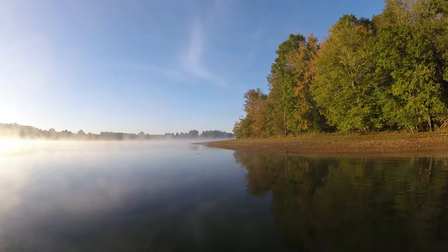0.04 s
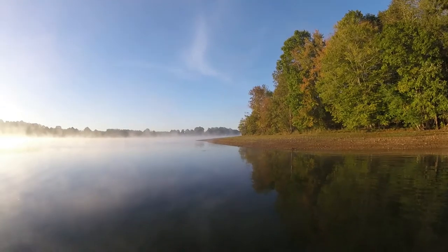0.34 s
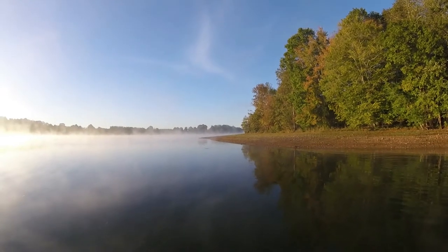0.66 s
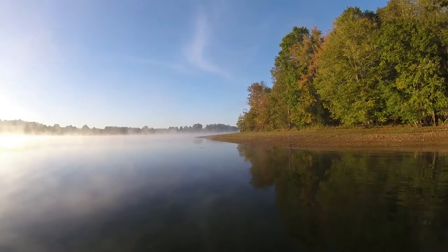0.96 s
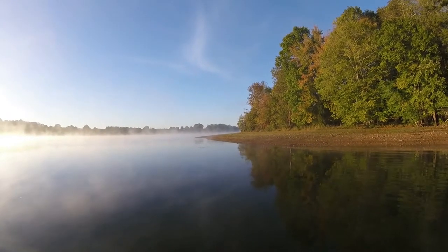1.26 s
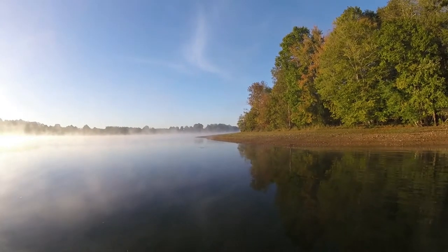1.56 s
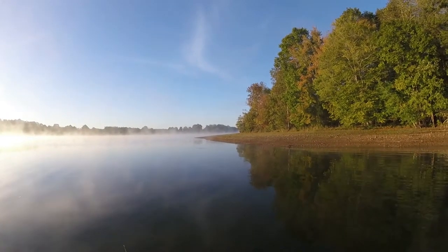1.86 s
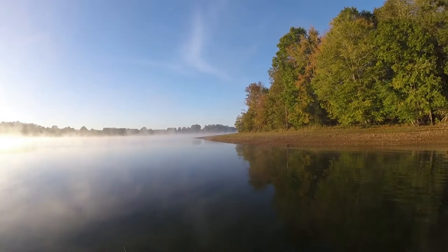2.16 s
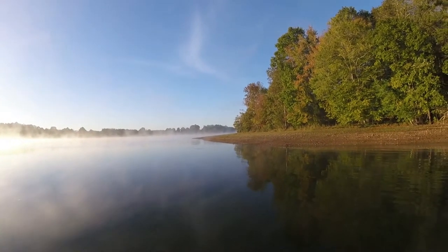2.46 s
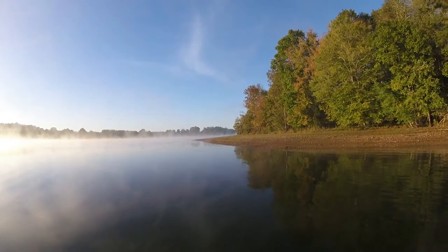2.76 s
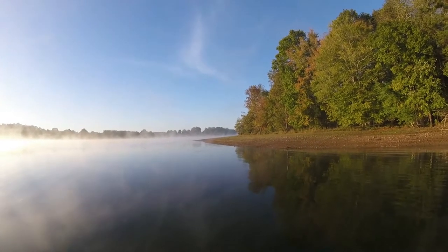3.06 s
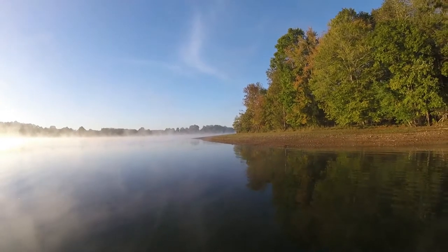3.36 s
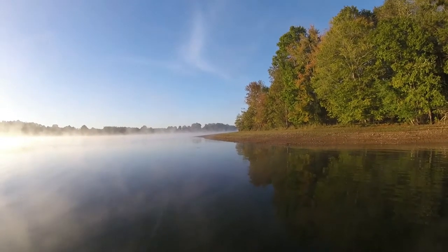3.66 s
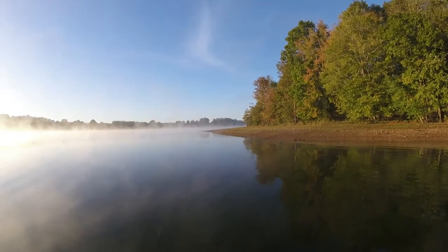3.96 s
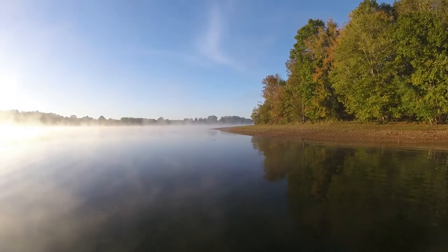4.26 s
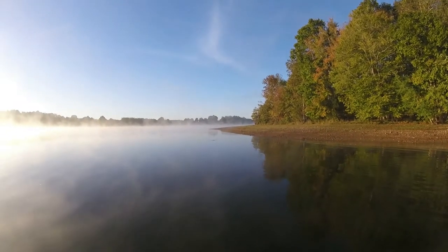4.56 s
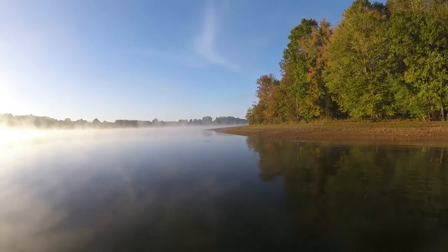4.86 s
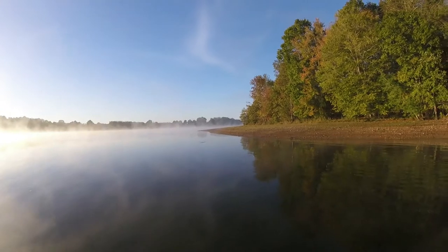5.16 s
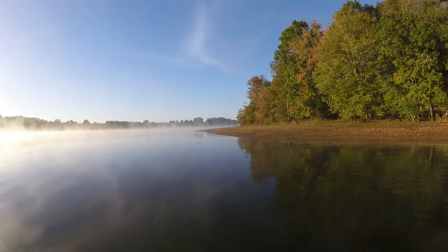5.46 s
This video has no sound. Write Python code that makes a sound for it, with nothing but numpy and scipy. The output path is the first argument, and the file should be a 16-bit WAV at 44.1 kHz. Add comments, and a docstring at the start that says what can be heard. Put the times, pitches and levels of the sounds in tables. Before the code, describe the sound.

A small boat's electric motor hums steadily over a soft wash of water, with tiny bubble ticks and a faint bird.

```python
"""Trolling motor on a calm lake

An electric motor pushes a small boat slowly along. Its shaft, slowing very slightly, shakes the hull
four times a turn: forced vibration makes a hum, and resonance keeps the hull droning. Water washes
along it and tiny bubbles tick at the bow. A small bird calls faintly twice in the trees on the shore,
over the steady hiss of the microphone on the boat."""
import sys
import numpy as np
from scipy import signal
from scipy.fft import rfft, irfft, next_fast_len
from scipy.io import wavfile
from scipy.ndimage import uniform_filter1d

SR = 44100
rng = np.random.default_rng(int(sys.argv[2]) if len(sys.argv) > 2 else 0)


def persist_wave(psi):
    """Save psi, clipped to +-1, as 16-bit WAV."""
    counts = np.round(np.clip(psi, -1, 1) * 32767).astype(np.int16)
    wavfile.write(sys.argv[1], SR, np.atleast_2d(counts).T)


N = 247842
T = np.arange(N) / SR
SHAFT_HZ, SLOWING_HZ_PER_S = 22.86, .138  # turns per second at the start, and their steady fall


def undb(db):
    """The decibel scale: amplitude grows tenfold every 20 dB."""
    return 10 ** (np.asarray(db) / 20)


def drift(rate_hz):
    """Low-pass fluctuation: random steps, smoothed twice; spread near 1."""
    hold = int(SR / rate_hz)
    steps = np.repeat(rng.standard_normal(N // hold + 1), hold)
    return 1.3 * uniform_filter1d(uniform_filter1d(steps, hold), hold)[:N]


def filtered_noise(gain_at):
    """Linear filtering: the spectrum of white noise times a gain at each frequency."""
    size = next_fast_len(N, True)
    hz = np.maximum(np.arange(size // 2 + 1) * SR / size, 1)
    return irfft(rfft(rng.standard_normal(size)) * gain_at(hz), size)[:N]


def coloured_noise(spectrum):
    """Spectral shaping: noise whose power density follows (frequency_hz, density_db) points."""
    hz, db = np.transpose(spectrum)
    return np.sqrt(SR / 2) * filtered_noise(lambda f: undb(np.interp(np.log(f), np.log(hz), db)))


def resonance(pitch_hz, width_hz):
    """Random excitation: a resonator passes a narrow band of noise; rms 1."""
    band = filtered_noise(lambda f: 1 / (1 + ((f - pitch_hz) / width_hz) ** 2))
    return band / band.std()


def glides(rows, rasp_rad, grain_samples):
    """Phase modulation: random jitter roughens sliding tones that swell and fade."""
    out = np.zeros(N)
    jitter = uniform_filter1d(rng.standard_normal(N), size=grain_samples)
    jitter = rasp_rad * jitter / jitter.std()
    for middle_s, length_s, start_hz, end_hz, level_db in rows:
        count = max(int(length_s * SR), 8)
        span = np.clip(int((middle_s - length_s / 2) * SR) + np.arange(count), 0, N - 1)
        phase = 2 * np.pi * np.cumsum(np.linspace(start_hz, end_hz, count)) / SR
        swell = np.sin(np.linspace(0, np.pi, count))
        out[span] += undb(level_db) * swell * np.sin(phase + jitter[span])
    return out


def scattered(direct, echo_db, t60_s):
    """Scattering: a diffuse, exponentially decaying tail follows the direct sound."""
    t = T[:SR // 2]
    tail = rng.standard_normal(len(t)) * np.exp(-np.log(1000) * t / t60_s)
    return direct + undb(echo_db) * signal.fftconvolve(direct, tail / np.linalg.norm(tail))[:N]


# Partials of the hum: shaft_multiple, starting_level_db, gain_db_per_hz of slowing
SHAFT_HARMONICS = [(4, -54.5, 12), (8, -55, -1), (9, -69, -3), (10, -68, 11), (12, -61, -4), (16, -58, 6.5),
                   (19, -72, 12), (20, -61.5, 13), (23, -77, 3), (24, -61, 8), (28, -62.5, 0),
                   (30, -74.5, 1.5), (32, -62.5, -10.5), (36, -66, -4), (40, -70.5, -2), (44, -75.5, -3.5)]

def motor_hum(speed_hz, angle, flutter_db=.56, wobble_rad=.008):
    """Forced vibration: shaft harmonics swell or fade as they slide across the hull's response."""
    dispersion_rad, panel_hz, panel_width_hz = .024, 380, 55
    slowing_hz = SHAFT_HZ - speed_hz
    angle = angle + wobble_rad * drift(12)
    hum = 0
    for order, starting_level_db, gain_db_per_hz in SHAFT_HARMONICS:
        level_db = starting_level_db + gain_db_per_hz * slowing_hz + flutter_db * drift(6)
        # higher partials arrive later, and a ringing hull panel holds back those near its pitch
        dispersion_lag = dispersion_rad * order ** 2 / 2
        panel_lag = 2 * np.arctan2(panel_width_hz, panel_hz - order * speed_hz)
        hum = hum + undb(level_db) * np.cos(order * angle - dispersion_lag - panel_lag)
    return hum


# Resonances of the hull: pitch_hz, width_hz, rms_db
HULL_MODES = [(68, 9, -57.5), (102.5, 2.7, -63.5), (134, 15, -68.5), (826.6, 2.2, -75), (943, 2.4, -80)]

def hull_drone(drone_hz=69.6, drone_db=-55, waver_rad=.45):
    """Resonance: the motor keeps the hull's modes ringing; a low wavering tone beats against the hum."""
    drone = undb(drone_db) * np.sin(2 * np.pi * drone_hz * T + waver_rad * drift(2.96))
    modes = sum(undb(rms_db) * resonance(hz, width_hz) for hz, width_hz, rms_db in HULL_MODES)
    return drone + modes


# Water and propeller noise through the hull: frequency_hz, density_db (power per Hz)
WASH_SPECTRUM = [(5, -100), (25, -79.5), (50, -78), (85, -83), (130, -80.5), (160, -86), (225, -83.5),
                 (300, -87.5), (450, -90), (600, -92), (880, -96), (1150, -101), (1700, -112), (4000, -135)]

def water_wash(angle, churn_depth=.34):
    """Amplitude modulation: the propeller churns the water noise four times a turn."""
    return coloured_noise(WASH_SPECTRUM) * (1 + churn_depth * np.cos(4 * angle))


# Noise floor of the microphone: frequency_hz, density_db (power per Hz)
HISS_SPECTRUM = [(1300, -100.5), (2600, -104), (4400, -114), (5000, -111), (6100, -107.5), (6480, -95),
                 (7000, -101.5), (8500, -104.5), (10400, -113.5), (11500, -110.5), (12400, -111),
                 (13700, -118), (14400, -130)]

def microphone_hiss(flicker_db=.46):
    """Self-noise: a broad hiss with one narrow resonance, flickering slightly in level."""
    return coloured_noise(HISS_SPECTRUM) * undb(flicker_db * drift(20))


# Bubbles at the bow: middle_s, pitch_hz, level_db
BUBBLES = [(.274, 5650, -59), (.4937, 5800, -56), (.502, 5800, -57), (.509, 5450, -63), (.531, 2600, -63),
           (.575, 5300, -59.5), (.58, 2350, -60.5), (2.083, 5750, -62), (3.05, 5170, -62),
           (3.802, 5100, -61), (4.001, 5700, -55), (4.34, 5850, -58), (4.354, 5750, -55),
           (4.532, 2300, -62), (4.539, 5350, -60), (4.608, 5950, -63), (4.79, 5700, -62), (4.86, 3300, -61),
           (4.969, 5750, -58), (4.985, 5650, -58), (5.324, 5550, -53.5), (5.34, 2630, -60),
           (5.59, 5400, -64)]

def bubble_ticks(faint_count=10, faint_hz=5600, faint_db=-69, pitch_spread=.08, spread_db=2):
    """Bubble resonance: each rings for the same number of cycles, so the low ones last longer."""
    cycles, rise = 25, .29  # each tick rises by this share of its pitch
    bubbles = list(BUBBLES)
    for when, pitch, strength in rng.random((faint_count, 3)):  # fainter ticks fall at random
        pitch_hz = faint_hz * (1 + pitch_spread * (2 * pitch - 1))
        level_db = faint_db + spread_db * (2 * strength - 1)
        bubbles.append((when * T[-1], pitch_hz, level_db))
    chirps = [(middle_s, cycles / hz, hz * (1 - rise / 2), hz * (1 + rise / 2), level_db)
              for middle_s, hz, level_db in bubbles]
    return scattered(glides(chirps, rasp_rad=.73, grain_samples=24), echo_db=-3.5, t60_s=.15)


# A thin falling whistle, then a quick rising chip: middle_s, length_s, start_hz, end_hz, level_db
BIRD_CALLS = [(2.36, .18, 8600, 7310, -66), (2.525, 0.0193, 5660, 7700, -54.5)]

def bird_calls():
    """Scattering by the trees gives a bird's thin gliding calls a short tail."""
    return scattered(glides(BIRD_CALLS, rasp_rad=.82, grain_samples=48), echo_db=-8, t60_s=.25)


def scene():
    """Superposition: motor, hull and water close by, hiss and a far bird add in one channel."""
    speed_hz = SHAFT_HZ - SLOWING_HZ_PER_S * T
    angle = 2 * np.pi * np.cumsum(speed_hz) / SR
    boat = motor_hum(speed_hz, angle) + hull_drone() + water_wash(angle)
    return (boat + microphone_hiss() + bubble_ticks() + bird_calls())[None]


def record(dry):
    """Band limiting: a steep low-pass filter cuts the highest treble."""
    cutoff_hz = 14200
    return signal.sosfilt(signal.ellip(10, .1, 70, cutoff_hz, fs=SR, output="sos"), dry)


dry = scene()
out = record(dry)
persist_wave(out)
```